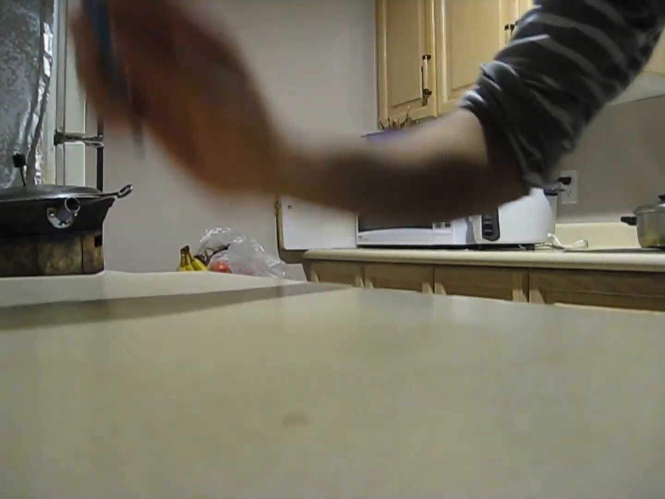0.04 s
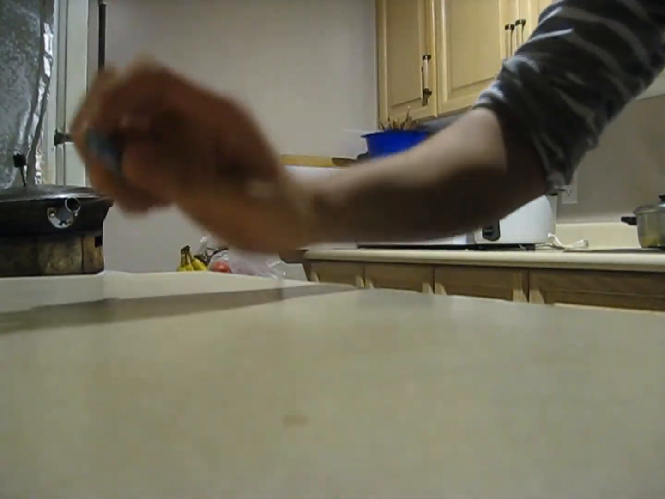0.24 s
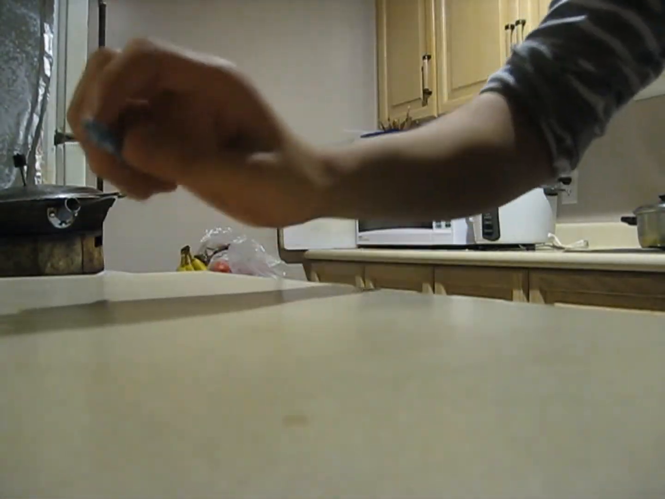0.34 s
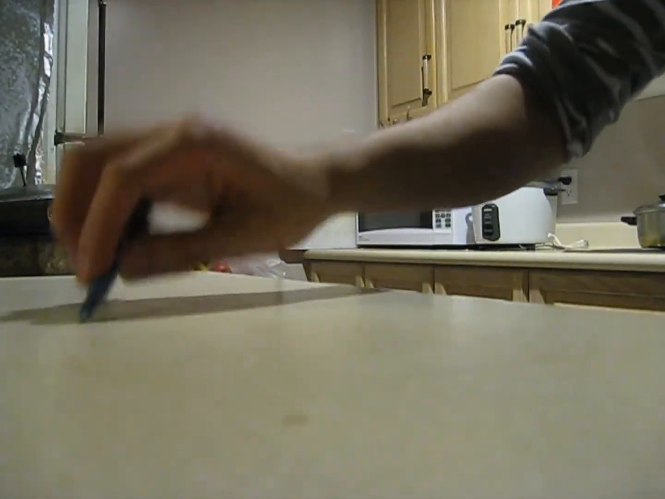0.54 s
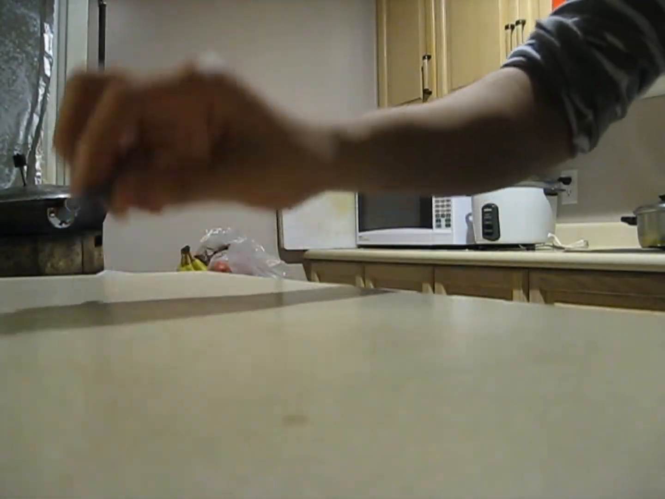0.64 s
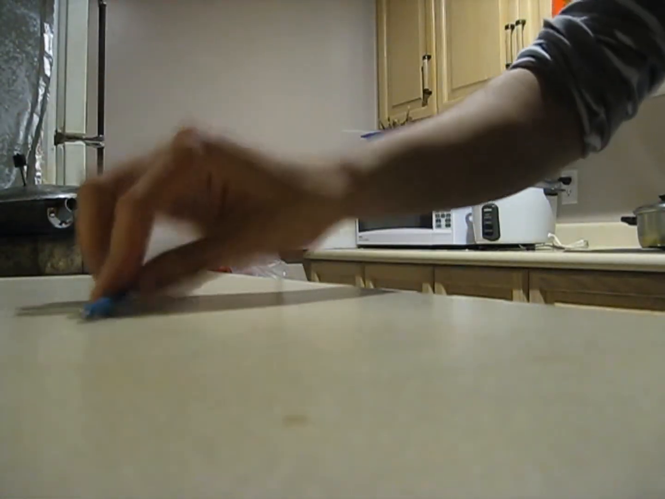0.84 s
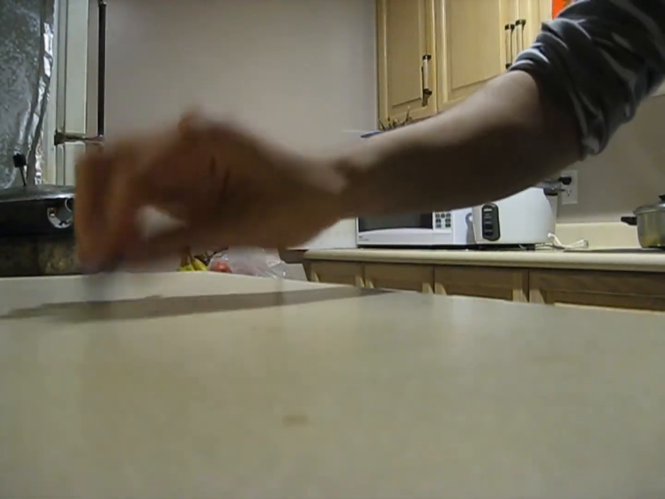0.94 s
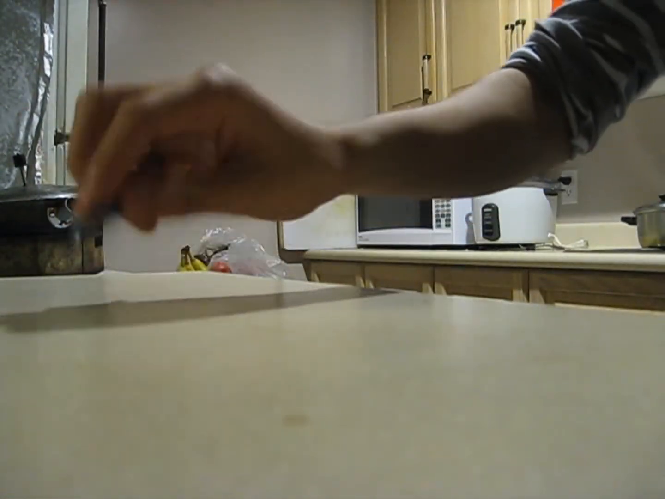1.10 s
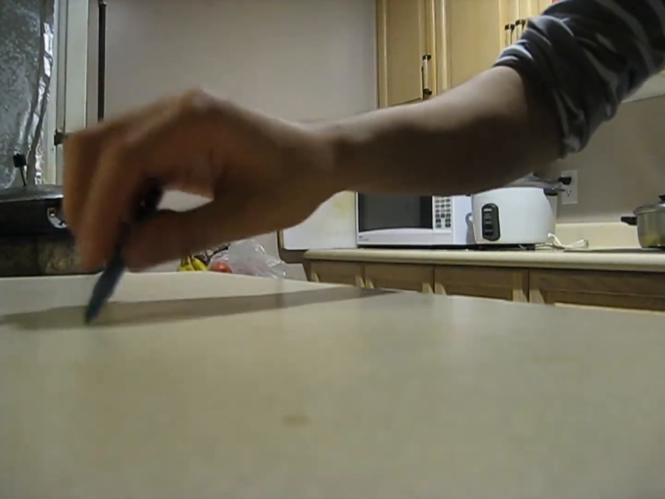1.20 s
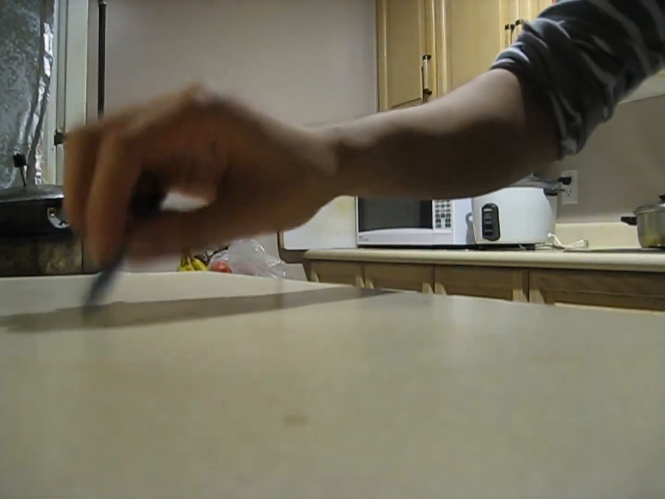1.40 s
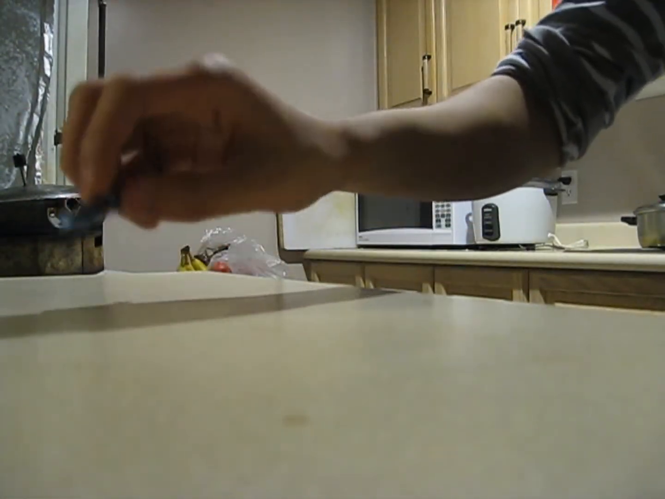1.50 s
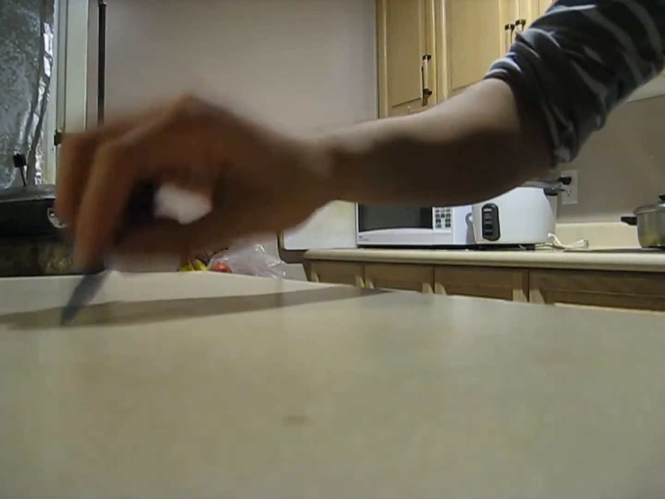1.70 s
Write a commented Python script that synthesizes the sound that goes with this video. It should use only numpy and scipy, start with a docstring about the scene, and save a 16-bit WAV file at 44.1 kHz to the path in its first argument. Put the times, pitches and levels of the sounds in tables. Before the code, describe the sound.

A pen strikes a kitchen countertop five times, close to the microphone. At 0.2 s a light tap lands with a low hand thump and brief loose rattle; a crisp click follows at 0.57. Near 0.93 the tip ticks and the barrel slaps down, loudest and clipped. Sharp taps follow at 1.27 and 1.45. Short bright room reflections, a low cabinet hum, soft air and faint appliance whirr.

```python
"""Pen taps on a kitchen countertop

A pen taps five times, heard close up: each blow is a crack of filtered noise plus a bank of ringing modes.
The first stroke lands with the hand, which thumps the slab and jolts loose things into a rattle.
On the third the pen tips over and its barrel slaps down hard; the cabinet hums on after the pen's blows.
A small live room answers as decaying noise bands, over soft air and a faint appliance whirr.
The recorder ducks and clips on the loud blows."""
import sys
import numpy as np
from scipy import signal
from scipy.fft import rfft, irfft
from scipy.io import wavfile

SR = 44100
rng = np.random.default_rng(int(sys.argv[2]) if len(sys.argv) > 2 else 0)


def transcribe(u):
    """Save the signal u as a 16-bit wav file named by the first command-line argument.

    u: samples, shape (n,) or (channels, n), limited to [-1, 1]; the rate is SR.
    q: integer samples, one column per channel.
    """
    v = np.clip(np.atleast_2d(u).T, -1, 1)
    q = np.round(v * 32767).astype(np.int16)
    wavfile.write(sys.argv[1], SR, q)


N = 77175  # 1.75 s

# strikes of the pen tip: t/s, strength/dB, contact cut-off f/Hz
TIP_TAPS = [(0.2051, -11, 12000), (0.5738, 1.5, 15400), (0.9247, 1, 19200), (1.2665, -2, 9900),
            (1.4472, 1, 11300)]
# slaps of the barrel as it comes down flat: t/s, strength/dB, contact cut-off f/Hz
BARREL_SLAPS = [(0.9350, 0, 4800), (0.9387, 22, 11600), (0.9431, 9.5, 9900)]


def from_db(db):
    """Decibels to gain."""
    return 10 ** (np.asarray(db) / 20)


def rms_one(x):
    """Scale to unit rms."""
    return x / np.sqrt(np.mean(x ** 2) + 1e-20)


def at_hz(points, hz):
    """Read a table on a log-frequency axis."""
    table_hz, values = np.array(points).T
    return np.interp(np.log(np.maximum(hz, 1)), np.log(table_hz), values)


def smooth(x, seconds):
    """One-pole average."""
    r = np.exp(-1 / (seconds * SR))
    return signal.lfilter([1 - r], [1, -r], x)


def room_air():
    """Soft broadband hush: noise shaped by a spectrum that falls off towards the treble."""
    # spectrum of the air: f/Hz, relative level/dB per Hz
    air_spectrum = [(30, -9.5), (60, -11), (110, -9), (200, -8.5), (400, -13), (600, -8), (900, -14.5),
                    (1200, -10.5), (1500, -16), (3000, -21), (8000, -26.5), (15500, -35.5)]
    hz = np.arange(N // 2 + 1) * SR / N
    spectrum = rfft(rng.standard_normal(N)) * from_db(at_hz(air_spectrum, hz))
    return from_db(-45) * rms_one(irfft(spectrum, N))


def appliance_whirr():
    """Narrow noise bands around fixed centres are heard as wavering tones."""
    # tones of the appliance: centre f/Hz, width/Hz, rms level/dB
    whirr_tones = [(672.5, 15, -51.5), (897, 90, -53), (1160, 20, -59.5)]
    hz = np.arange(N // 2 + 1) * SR / N
    whirr = 0
    for centre_hz, width_hz, db in whirr_tones:
        spectrum = rfft(rng.standard_normal(N)) / (1 + ((hz - centre_hz) / width_hz) ** 2)
        whirr = whirr + from_db(db) * rms_one(irfft(spectrum, N))
    return whirr


def kitchen(x):
    """Dense reflections build up after a short gap and die away band by band."""
    # colour of the room's answer to a click: f/Hz, level/dB
    room_colour = [(80, -13), (180, 14), (280, 10), (500, 7), (1000, 0.5), (2000, 1.5), (4000, -5),
                   (7000, -1), (11000, 0), (16000, 11)]
    # decay of the room: f/Hz, t60/s
    room_t60 = [(100, 0.45), (400, 0.17), (1000, 0.29), (2500, 0.34), (6000, 0.31), (14000, 0.18)]
    delay_s, build_s = 0.0025, 0.00073
    t = np.arange(N) / SR
    white = rng.standard_normal((2, N))  # neighbouring bands take turns, so they stay independent
    edges = np.geomspace(60, 18000, 17)
    tail = 0
    for k, (low, high) in enumerate(zip(edges, edges[1:])):
        hz = np.sqrt(low * high)
        rate = np.log(1000) / at_hz(room_t60, hz)
        band_pass = signal.butter(2, [low, high], "band", fs=SR, output="sos")
        band = signal.sosfilt(band_pass, white[k % 2])
        decay = np.exp(-rate * t) * np.sqrt(2 * rate / SR)  # unit energy
        tail = tail + band * from_db(at_hz(room_colour, hz)) * decay
    build = 1 - np.exp(-np.maximum(t - delay_s, 0) / build_s)
    return signal.fftconvolve(x, tail * build)[:N]


def ring(force, hz, t60):
    """A unit click sets a sine of height 1 ringing, which dies away by 60 dB in t60."""
    r = np.exp(-np.log(1000) / (t60 * SR))
    w = 2 * np.pi * hz / SR
    return signal.lfilter([0, np.sin(w)], [1, -2 * r * np.cos(w), r * r], force + 1e-18)


def soften(x, cut_hz):
    """The softer the contact, the longer it lasts and the less treble it gives."""
    r = np.exp(-2 * np.pi * cut_hz / SR)
    return signal.lfilter([(1 - r) ** 2], [1, -2 * r, r * r], x + 1e-18)


def crack(start_s, level_db, t60, low_hz, high_hz):
    """A band of noise bursts out at the blow and decays exponentially."""
    age = np.arange(N) / SR - start_s
    decay = np.exp(-np.log(1000) * np.clip(age / t60, 0, 4))
    burst = rng.standard_normal(N) * (age >= 0) * decay
    band = signal.butter(1, [low_hz, min(high_hz, SR * .45)], "band", fs=SR, output="sos")
    twice = np.vstack([band, band])
    width_gain = np.sqrt(SR / 2 / high_hz)  # a lower band gets more gain
    return from_db(level_db) * width_gain * signal.sosfilt(twice, burst + 1e-18)


def strike(blows, modes, crack_settings, room_db):
    """Blows crack and ring a body's modes, neighbours swinging opposite ways; gives (direct, room send)."""
    mode_scatter_db = 0.4  # no two blows ring the modes quite alike
    crack_spread_db = 8.5  # the crack radiates all round, so the room gets more of it
    pushes, cracks = [], 0
    for start_s, db, cut_hz in blows:
        click = signal.unit_impulse(N, int(start_s * SR))
        pushes.append(from_db(db) * soften(click, cut_hz))
        cracks = cracks + from_db(db) * soften(crack(start_s, *crack_settings), cut_hz)
    shares = from_db(mode_scatter_db * rng.standard_normal((len(blows), len(modes))))
    rings = 0
    for k, (hz, db, t60) in enumerate(modes):
        force = shares[:, k] @ np.array(pushes)
        rings = rings + (-1) ** k * from_db(db) * ring(force, hz, t60)
    room_send = from_db(room_db) * (rings + from_db(crack_spread_db) * cracks)
    return np.array([rings + cracks, room_send])


def cabinet():
    """Each blow of the pen sets a low mode of the cabinet under the top humming."""
    pushes = 0
    for start_s, db, _ in TIP_TAPS + BARREL_SLAPS:
        pushes = pushes + from_db(db) * signal.unit_impulse(N, int(start_s * SR))
    return from_db(-45) * ring(pushes, hz=107, t60=0.42)


def loose_rattle():
    """Loose things jolted by the thump clatter through a few light, thin modes."""
    # knocks of the loose things: t/s, strength/dB, contact cut-off f/Hz
    rattle_knocks = [(0.2190, 2, 7150), (0.2275, 3.5, 6000), (0.2400, -3.5, 5000), (0.2485, -5.5, 3480)]
    # their resonances: f/Hz, level/dB, t60/s
    rattle_modes = [(760, -15, 0.013), (1075, -21.5, 0.11), (1530, -27, 0.023), (1880, -28, 0.049),
                    (2510, -22, 0.028), (5300, -30, 0.049), (5520, -39, 0.11)]
    rattle_crack = (-28, 0.3349, 693, 2800)  # level/dB, t60/s, low f/Hz, high f/Hz
    return strike(rattle_knocks, rattle_modes, rattle_crack, room_db=-35.5)


def hand_thump():
    """The soft hand, then what it jolted dropping back, booms through the slab and its cabinet."""
    # landing of the hand, then the drops: t/s, strength/dB, contact cut-off f/Hz
    thump_blows = [(0.2051, 4.5, 1050), (0.2257, -5.5, 710), (0.2316, -11.5, 895), (0.2484, -14, 1490)]
    # resonances of slab and cabinet: f/Hz, level/dB, t60/s
    slab_modes = [(87, -6, 0.085), (113.2, -20.5, 0.37), (107.6, -7.5, 0.16), (161.3, -8.5, 0.15),
                  (247, -18, 0.16), (299, -20, 0.17), (347, -20.5, 0.15), (467.4, -23, 0.26),
                  (542, -22, 0.096), (603, -29, 0.055), (795, -14, 0.017), (1065, -2, 0.033),
                  (1370, -2, 0.0082), (2140, 6, 0.018)]
    thump_crack = (-20.5, 0.363, 288, 1112)  # level/dB, t60/s, low f/Hz, high f/Hz
    return strike(thump_blows, slab_modes, thump_crack, room_db=-21)


def barrel_slap():
    """The barrel slaps flat; gripped by the fingers, each mode dies within so many cycles."""
    # resonances of the barrel on the top: f/Hz, level/dB
    barrel_modes = [(110, -31), (250, -34), (460, -26), (690, -15), (790, -12), (1040, -10.5), (1330, -7),
                    (1600, -10), (1850, -6.5), (2250, -5), (2600, -6.5), (2950, -3.5), (3900, -7),
                    (5600, -15.5), (7800, -14), (11500, -7)]
    ring_cycles, longest_t60_s = 21.6, 0.036
    gripped_modes = [(hz, db, min(ring_cycles / hz, longest_t60_s)) for hz, db in barrel_modes]
    slap_crack = (-9.5, 0.0319, 705, 6000)  # level/dB, t60/s, low f/Hz, high f/Hz
    return strike(BARREL_SLAPS, gripped_modes, slap_crack, room_db=-10.5)


def tip_taps():
    """The hard pen tip makes brief, bright contacts that ring short modes on the top."""
    # resonances of the tip on the top: f/Hz, level/dB, t60/s
    tip_modes = [(125, -33, 0.12), (474, -19, 0.029), (868, -8.5, 0.011), (1027, -8.5, 0.027),
                 (1224, -19.5, 0.048), (1719, -9.5, 0.024), (2064, -7.5, 0.016), (2344, -13.5, 0.032),
                 (2763, -7, 0.0075), (3370, -13.5, 0.011), (3960, -9.5, .01), (4870, -10.5, 0.0098),
                 (5787, -4, 0.0071), (7440, -0.5, 0.0023), (9850, -7.5, 0.0022), (12750, -8.5, 0.0015)]
    tap_crack = (-16.5, 0.0339, 600, 9000)  # level/dB, t60/s, low f/Hz, high f/Hz
    return strike(TIP_TAPS, tip_modes, tap_crack, room_db=-10)


def scene():
    """Pen, hand and rattle, heard directly and through the room, over the kitchen's background."""
    direct, room_send = loose_rattle() + hand_thump() + barrel_slap() + tip_taps()
    blows = direct + cabinet() + kitchen(room_send)
    mic_low_cut = signal.butter(2, 84, "high", fs=SR, output="sos")
    background = room_air() + appliance_whirr()
    return (signal.sosfilt(mic_low_cut, blows) + background)[None]


def record(dry):
    """A limiter ducks just too late and recovers steadily; what gets past it clips; the top is cut."""
    limit_db, release_db_per_s = -2, 160
    sense_s, attack_s = 0.0011, 0.0017
    level_db = 10 * np.log10(smooth(dry ** 2, sense_s) + 1e-12)
    over_db = np.maximum(level_db - limit_db, 0)
    # a running peak against a rising ramp gives a straight-line release
    ramp = release_db_per_s * np.arange(N) / SR
    held_db = np.maximum.accumulate(over_db + ramp, axis=-1) - ramp
    duck_db = smooth(held_db, attack_s)
    clipped = np.clip(dry * from_db(-duck_db), -1, 1)
    top_cut = signal.ellip(10, .1, 70, 15900, fs=SR, output="sos")
    return signal.sosfilt(top_cut, clipped)


dry = scene()
out = record(dry)
transcribe(out)
```